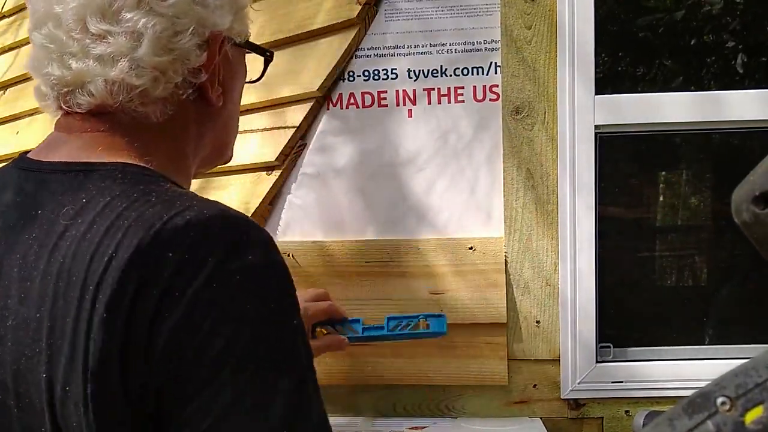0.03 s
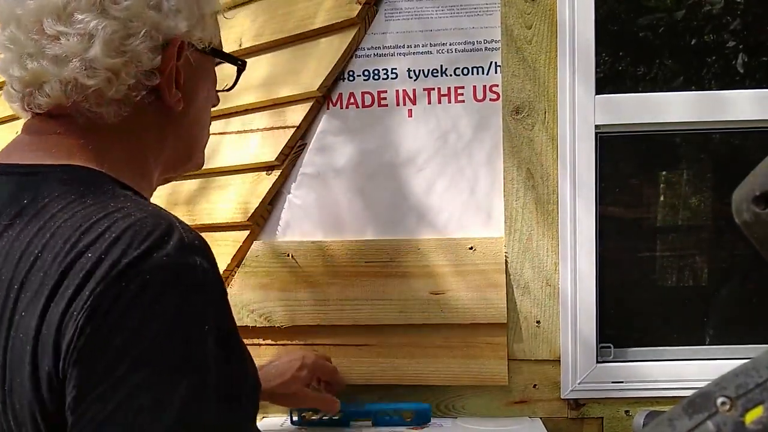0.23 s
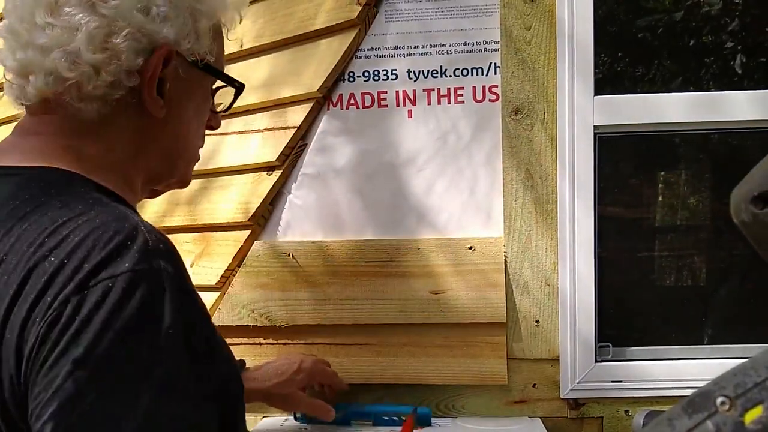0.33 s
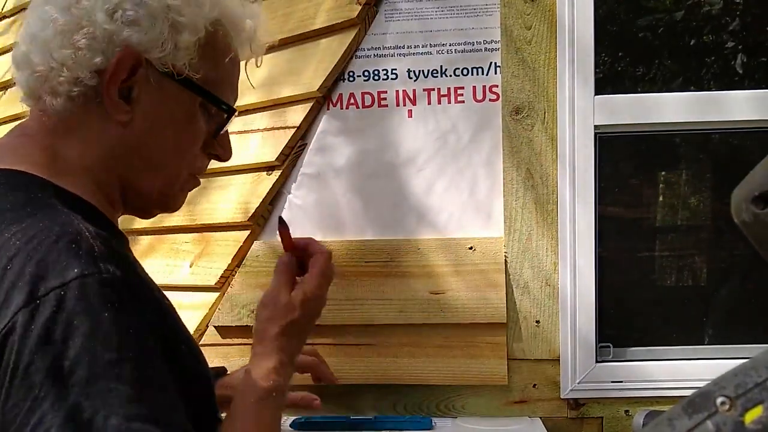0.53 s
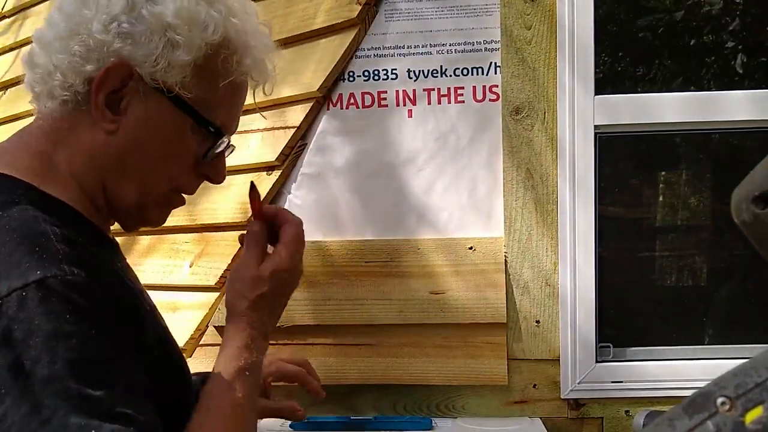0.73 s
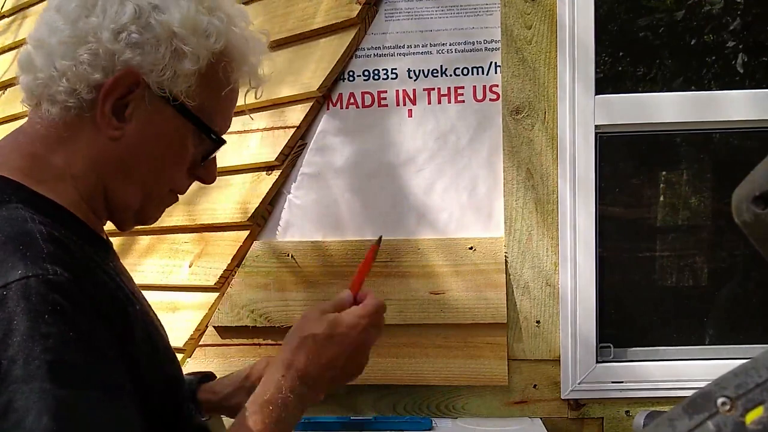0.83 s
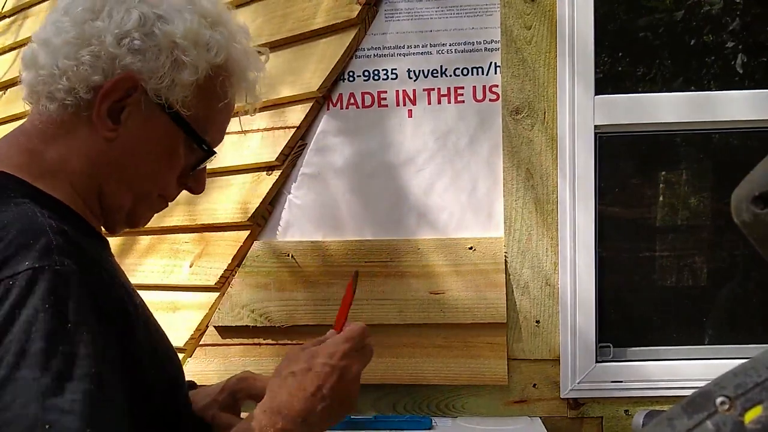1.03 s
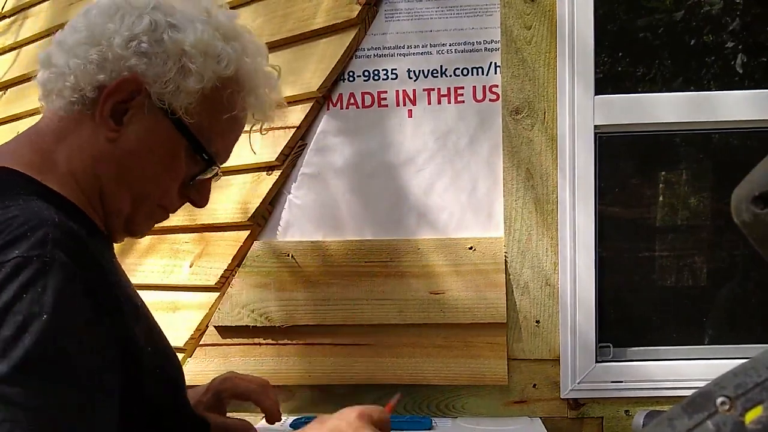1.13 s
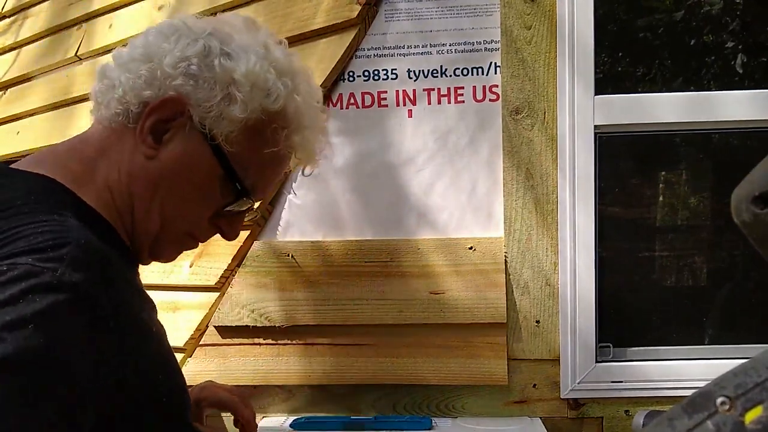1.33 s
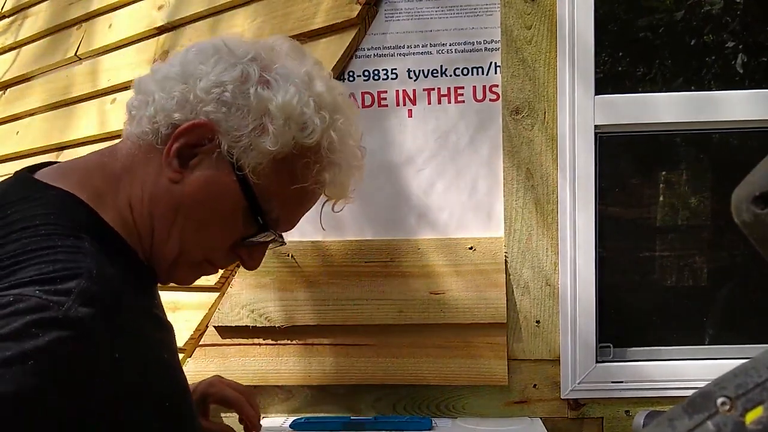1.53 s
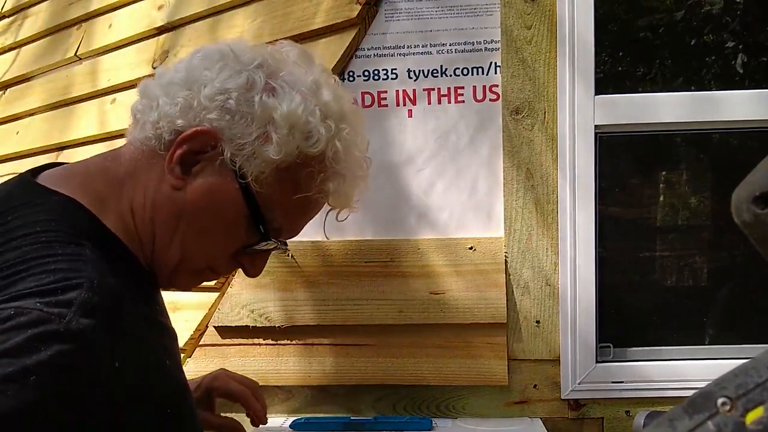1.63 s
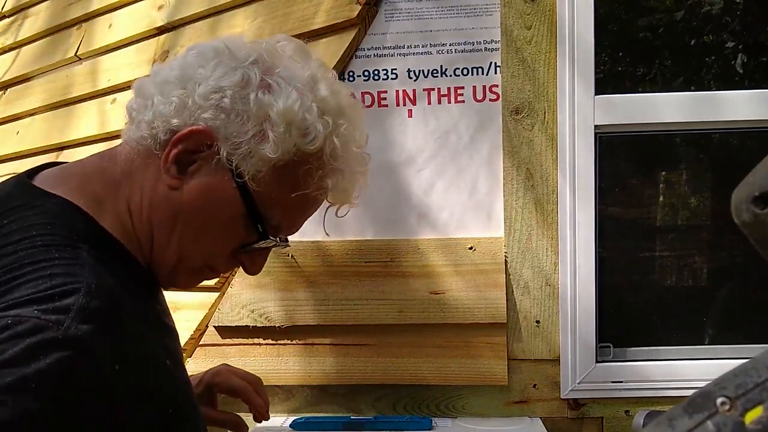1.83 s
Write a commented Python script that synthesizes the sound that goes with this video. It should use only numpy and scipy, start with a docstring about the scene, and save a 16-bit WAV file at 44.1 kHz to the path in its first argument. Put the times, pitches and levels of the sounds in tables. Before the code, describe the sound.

A plastic spirit level is set down on a wooden board with two sharp clacks, then rocks and settles in duller knocks. A hand softly bumps the wood afterwards, over a faint, high insect and quiet outdoor air.

```python
"""Outdoors by a house, a plastic spirit level slides off wooden siding and is set down on a board.
It gives two sharp clacks, then rocks and settles with a few duller knocks. Each knock makes the
board and the tool ring, and the wall and yard echo it. A hand then brushes and bumps the wood.
Behind this an insect pulses very high, over far-off whistles, a faint motor hum and quiet air."""
import sys
import numpy as np
from scipy import signal
from scipy.fft import rfft, irfft
from scipy.io import wavfile

SR = 44100
rng = np.random.default_rng(int(sys.argv[2]) if len(sys.argv) > 2 else 0)


def generate_wav(sig):
    """Save sig (samples, or channels by samples) to the path in sys.argv[1] as 16-bit PCM at SR."""
    pcm = np.round(np.clip(np.atleast_2d(sig).T, -1, 1) * 32767).astype(np.int16)
    wavfile.write(sys.argv[1], SR, pcm)


N = 83790

# Each knock; its four gains add to the base levels of the parts, set below the tables:
# start_s, gain_db, thump_db, thump_hz, favoured_hz, bright_hz, rise_s, crack_db, snap_db
KNOCK_EVENTS = [(0.238, -2, -4, 513, 935, 12930, 0.0022, 2, -20),
                (0.288, -3.5, -3, 427, 1994, 7600, 0.00028, 2, 8.5),
                (0.3046, -5, 2.5, 215, 901, 1700, 0.001, -33, -30),
                (0.3430, -9, 5, 285, 950, 4100, 0.0003, -17, -33),
                (0.3731, -13, 1, 309, 2125, 9800, 0.0033, -8, -18),
                (0.387, -14.5, -3.5, 376, 1800, 6160, 0.0013, -33, -24),
                (0.4417, -11, -11, 316, 2380, 3250, 0.0003, -23.5, -24),
                (0.4884, -6, -12.5, 301.4, 1182, 4390, 0.00031, -13.5, -22.5),
                (0.5660, -13, -11.5, 283, 800, 2600, 0.0012, -41, -38),
                (0.606, -26.5, -25, 278, 2330, 2950, 0.0017, -47, -49)]
# Light ticks of the edge chattering between knocks: start_s, level_db
EDGE_TICKS = [(.3565, -49), (.3815, -41), (.3895, -44)]
# Treble limit of each knock; the later knocks sound duller: time_s, limit_hz
TREBLE_LIMIT = [(.39, 16000), (.44, 12500), (.49, 9800)]
# Soft touches of a hand on the wood: start_s, level_db
HAND_TOUCHES = [(0.965, -58), (1.260, -53), (1.481, -44.5)]
# Far-off notes, probably birds: start_s, length_s, pitch_hz, level_db, overtone_db
WHISTLE_NOTES = [(0.937, 0.11, 975, -69.5, -35), (0.95, 0.058, 1294, -74, -25),
                 (1.041, 0.088, 1770, -80.5, -25), (1.058, 0.087, 2164, -85, -14),
                 (1.215, 0.03, 2780, -83, -25), (1.326, .14, 2160, -80, -7),
                 (1.731, 0.05, 3930, -79.5, -25)]
# Tones of a distant motor: pitch_hz, level_db
MOTOR_TONES = [(77.6, -69.5), (155.2, -74)]

# Tones that struck things ring with: pitch_hz, gain_db, decay_s (time to fade by 60 dB)
BOARD_TONES = [(155.3, -19.5, .5), (193, -17.5, 0.4), (261.4, -0.5, 0.16), (282.1, -1.5, 0.22),
               (316.4, -5.5, 0.37), (354.8, -11, 0.33), (444.6, 2, 0.24), (509.5, -1, 0.342)]
TOOL_TONES = [(791, -9, .14), (850, -3, .16), (933, 1, .11), (1001, -6, .14), (1044, -4, .15),
              (1120, -1, .11), (1334, -3, .1), (1396, -1, .16), (1555, 0, .12), (1770, -13, .85),
              (1866, 3, .12), (1986, 3, .11), (2090, 0, .1), (2348, 4, .14), (2690, 2, .1)]
SNAP_TONES = [(4980, 1, .018), (8350, -7, .016), (9950, 0, .013), (11000, 1, .018)]  # the hard plastic edge
TOUCH_TONES = [(505, 0, .06), (600, -6, .05), (890, -15, .05), (3100, -24, .04)]  # wood touched by a hand

# Colours, or how strong a noise is from low to high: pitch_hz, gain_db
CLATTER_COLOUR = [(120, -34), (230, -11.5), (450, -1), (620, -4), (900, -0.5), (1350, -2), (2300, -3.5),
                  (3300, -7.5), (6000, -13), (8500, -10), (11000, -2), (13000, -10.5), (16000, -24)]  # many short rings of tool and board together
CRACK_COLOUR = [(400, -35), (2000, 1), (4200, -16.5), (5000, -7.5), (6000, -5.5), (8300, -1.5),
                (10000, 0.5), (11100, -3.5), (11800, 1), (16000, -16)]  # the hard contact itself
THUD_COLOUR = [(120, -17), (200, -11), (270, 12.5), (480, 9), (700, 0), (1200, -29)]  # the board's dull thud
YARD_COLOUR = [(150, -12.5), (300, -6), (450, 4.5), (950, 5.5), (1400, -3.5), (1750, -3.5), (2200, -8.5),
               (4000, -1), (10000, 3), (16000, 1)]  # the yard's echoes
RUB_COLOUR = [(300, -12.5), (700, -13), (950, -2), (1200, -5.5), (1400, 7), (1600, -11.5), (1850, -16.5),
              (2300, -33), (6500, -35), (9000, -33), (10600, -7), (12000, -40.5), (16000, -61)]  # the tool rubbing on the siding
HANDLING_COLOUR = [(420, 1.5), (1100, -0.5), (2000, -9.5), (3100, -0.5), (4000, -5), (5500, -20)]  # hands and sleeves
RASP_COLOUR = [(6000, -11), (8500, -8), (10000, -7.5), (11100, 8), (12200, -18.5), (15000, -20.5),
               (16500, -23)]  # the insect's rasp
AIR_COLOUR = [(25, -15.5), (60, -9.5), (110, -8.5), (200, -5), (300, -6), (390, 6), (480, -12), (620, -2.5),
              (720, -11), (920, 0.5), (1100, -21), (2000, -28), (3500, -24), (6000, -40), (9000, -22),
              (13000, -21.5), (16000, -38)]  # outdoor air
FAR_RUSH_COLOUR = [(300, -32), (420, -7), (520, 2), (610, 6.5), (680, -32.5), (1000, -32)]  # a low rush in the distance

# How the longer sounds swell and fade: time_s, level_db
SLIDE_LEVELS = [(0, -55), (.04, -56), (.08, -52), (.13, -56), (.182, -56), (.197, -76), (.235, -78)]
HANDLING_LEVELS = [(.85, -100), (.93, -78), (1.15, -88.5), (1.42, -85), (1.49, -86.5), (1.9, -86)]
INSECT_LEVELS = [(0, -56.5), (.12, -56.5), (.2, -62), (.55, -57.5), (.62, -64), (.73, -56.5), (.85, -72),
                 (.95, -53), (1.0, -56.5), (1.07, -69.5), (1.12, -53.5), (1.25, -60.5), (1.3, -72.5),
                 (1.38, -57), (1.44, -67.5), (1.56, -65.5), (1.72, -61.5), (1.82, -72.5), (1.9, -76)]
FAR_RUSH_LEVELS = [(0, -71.5), (.8, -69), (1.15, -79), (1.3, -72), (1.55, -68.5), (1.9, -70.5)]

CLATTER_DB, TOOL_DB, CRACK_DB, SNAP_DB, BOARD_DB, THUD_DB = -20.5, -37.5, -28, -28, -36, -33.5
FAVOUR_DB, FAVOUR_OCTAVES = 5.5, .21  # each knock lifts the tones near its favoured pitch
BOARD_RISE_S, BOARD_LOW_HZ, THUMP_OCTAVES = .0078, 150, .8
SLIDE_DB, SQUEAK_HZ, SQUEAK_WAVER, SQUEAK_DB = -1.5, 1372, .021, -5
INSECT_HZ, INSECT_WAVER_HZ, RASP_DB = 11090, 80, -15.5
PULSE_RATE_HZ, PULSE_FIRST_S, PULSE_WIDTH_S = 38.8, .018, .0029
AIR_DB, AIR_FLICKER_DB = -70, 3


def knocks(t):
    """The tool hits the board: the contact cracks and snaps, both ring, and the board thumps."""
    hz, out = np.fft.rfftfreq(N, 1 / SR), np.zeros(N)
    for start, db, thump_db, thump_hz, favoured_hz, bright_hz, rise, crack_db, snap_db in KNOCK_EVENTS:
        lift_db = lambda pitch: FAVOUR_DB * near(pitch, favoured_hz, FAVOUR_OCTAVES)
        clatter = irfft(rfft(noise(CLATTER_COLOUR)) * soften(hz, bright_hz) * gain(lift_db(hz)), N)
        knock = gain(db + CLATTER_DB) * fade(clatter, start, rise, decay_s=.13, slope=-.11)
        tool = [(pitch, level + lift_db(pitch), decay) for pitch, level, decay in TOOL_TONES]
        knock += gain(db + TOOL_DB) * ring(tool, start, rise, bright_hz, scatter_db=3)
        knock += gain(crack_db + CRACK_DB) * crack(t - start)
        snap = ring(SNAP_TONES, start, rise_s=.00074, bright_hz=16000, scatter_db=2)
        knock += gain(snap_db + SNAP_DB) * snap
        # Where the tool lands decides which board tones sound most.
        board = [(pitch, level + 20 * np.log10(near(pitch, thump_hz, THUMP_OCTAVES)), decay)
                 for pitch, level, decay in BOARD_TONES]
        knock += gain(thump_db + BOARD_DB) * ring(board, start, BOARD_RISE_S, bright_hz, scatter_db=2.5)
        thud = irfft(rfft(noise(THUD_COLOUR)) * near(hz, thump_hz, THUMP_OCTAVES), N)
        knock += gain(thump_db + THUD_DB) * thud * strike(start, BOARD_RISE_S, decay_s=.1)
        band = signal.butter(6, [BOARD_LOW_HZ, follow(TREBLE_LIMIT, start)], "band", fs=SR, output="sos")
        out += signal.sosfilt(band, knock)
    return out + sum(gain(db) * crack(t - start) for start, db in EDGE_TICKS)


def crack(age, rise_s=.0002, hold_s=.002, decay_s=.013):
    """Hard plastic meets wood: a burst of noise that holds for a moment, then drops at once."""
    drop = np.exp(-np.log(1000) * np.maximum(age - hold_s, 0) / decay_s)
    return noise(CRACK_COLOUR) * np.clip(age / rise_s, 0, 1) * drop


def yard_echo(sound):
    """The wall and trees scatter the sound back a moment later."""
    tail = fade(noise(YARD_COLOUR), start_s=.00955, rise_s=.0059, decay_s=.68, slope=-.3)
    return echoes(sound, tail, level_db=-14)


def hand_bumps():
    """A soft hand touches the wood, which gives a short, dull ring."""
    return sum(gain(db) * ring(TOUCH_TONES, start, rise_s=.005, bright_hz=4000, scatter_db=1)
               for start, db in HAND_TOUCHES)


def slide(t):
    """The tool rubs lightly and unevenly on the siding, with a wavering squeak."""
    squeak = np.sqrt(2) * np.sin(phase_of(SQUEAK_HZ * (1 + SQUEAK_WAVER * wander(100))))
    pressure = gain(SLIDE_DB + follow(SLIDE_LEVELS, t, after=-120) + 2 * wander(50))
    return pressure * (noise(RUB_COLOUR) + gain(SQUEAK_DB) * squeak)


def rustle(t, uneven_db=3.5):
    """Hands and sleeves brush the work in small, uneven scuffs."""
    return gain(follow(HANDLING_LEVELS, t) + uneven_db * wander(45)) * noise(HANDLING_COLOUR)


def insect(t, uneven_db=1.7):
    """Steady wing strokes pulse a very high tone with a little rasp, blurred by short echoes."""
    cycle = (t - PULSE_FIRST_S) * PULSE_RATE_HZ + .5
    from_peak_s = (cycle % 1 - .5) / PULSE_RATE_HZ
    strokes = np.exp(-.5 * (from_peak_s / PULSE_WIDTH_S) ** 2)
    tone = np.sqrt(2) * np.sin(phase_of(INSECT_HZ + INSECT_WAVER_HZ * wander(250)))
    loudness = gain(follow(INSECT_LEVELS, t) + uneven_db * wander(28))
    song = loudness * strokes * (tone + gain(RASP_DB) * noise(RASP_COLOUR))
    tail = rng.standard_normal(N) * strike(start_s=.0054, rise_s=.002, decay_s=.179)
    return song + echoes(song, tail, level_db=-9.5)


def whistles(t, waver=.011, overtone_ratio=1.94):
    """Far-off wavering notes swell and fade, each with one weaker, higher tone."""
    out = np.zeros(N)
    for start, length, hz, db, overtone_db in WHISTLE_NOTES:
        phase = phase_of(hz * (1 + waver * wander(110)))
        swell = np.sin(np.pi * np.clip((t - start) / length, 0, 1) ** .59)
        note = np.sin(phase) + gain(overtone_db) * np.sin(overtone_ratio * phase)
        out += gain(db) * np.sqrt(2) * swell * note
    return out


def motor_hum(t):
    """A distant motor hums on two steady, low tones."""
    return sum(gain(db) * np.sqrt(2) * np.sin(2 * np.pi * (hz * t + rng.random()))
               for hz, db in MOTOR_TONES)


def outdoor_air(t):
    """Quiet air flickers in each octave, while a faint, distant rush swells and fades."""
    air = sum(band * gain(AIR_FLICKER_DB * wander(10)) for _, band in octave_bands(noise(AIR_COLOUR)))
    rush = gain(follow(FAR_RUSH_LEVELS, t)) * noise(FAR_RUSH_COLOUR)
    return gain(AIR_DB) * air + rush


def ring(tones, start_s, rise_s, bright_hz, scatter_db, detune=.005):
    """A struck thing rings with fading tones; each hit shifts their level and pitch a little."""
    age, out = np.arange(N) / SR - start_s, np.zeros(N)
    for hz, db, decay_s in tones:
        level_shift, pitch_shift = rng.standard_normal(2)
        strength = gain(db + scatter_db * level_shift) * soften(hz, bright_hz)
        tone = np.sin(2 * np.pi * hz * (1 + detune * pitch_shift) * age)
        out += strength * tone * strike(start_s, rise_s, decay_s)
    return out


def strike(start_s, rise_s, decay_s):
    """The loudness of a hit: it swells quickly, then dies away."""
    age = np.maximum(np.arange(N) / SR - start_s, 0)
    return (1 - np.exp(-age / rise_s)) * np.exp(-np.log(1000) * age / decay_s)


def fade(sound, start_s, rise_s, decay_s, slope):
    """Shape a sound like a hit; decay_s holds at 1 kHz, and a negative slope ends the highs sooner."""
    return sum(band * strike(start_s, rise_s, decay_s * 2 ** (octave * slope))
               for octave, band in octave_bands(sound))


def octave_bands(sound):
    """Split a sound from low to high into pairs of (octaves above 1 kHz, band)."""
    octave = np.log2(np.clip(np.fft.rfftfreq(N, 1 / SR), 125, 16000) / 1000)
    spectrum = rfft(sound)
    return [(k, irfft(spectrum * np.maximum(1 - abs(octave - k), 0), N)) for k in range(-3, 5)]


def echoes(sound, tail, level_db):
    """Spread a sound along a tail of reflections."""
    return gain(level_db) * signal.fftconvolve(sound, tail / np.sqrt(np.sum(tail ** 2)))[:N]


def soften(hz, bright_hz):
    """A softer contact makes less treble: pitches above bright_hz get weaker."""
    return 1 / np.sqrt(1 + (hz / bright_hz) ** 4)


def near(hz, centre_hz, octaves):
    """A weight that is 1 at the centre pitch and falls away on both sides."""
    return 1 / (1 + (np.log2((hz + 1) / centre_hz) / octaves) ** 2)


def noise(colour):
    """Noise with the given colour and a typical size of 1."""
    hz, db = np.array(colour, float).T
    shape = gain(np.interp(np.log(np.fft.rfftfreq(N, 1 / SR) + 1), np.log(hz), db))
    hiss = irfft(rfft(rng.standard_normal(N)) * shape, N)
    return hiss / hiss.std()


def wander(rate_hz):
    """A smooth random drift with a typical size of 1."""
    smoothing = np.exp(-(np.fft.rfftfreq(N, 1 / SR) / rate_hz) ** 2)
    drift = irfft(rfft(rng.standard_normal(N)) * smoothing, N)
    return drift / drift.std()


def phase_of(hz):
    """The running angle of a wave whose pitch changes."""
    return 2 * np.pi * np.cumsum(hz) / SR


def follow(points, t, after=None):
    """Join (time, value) points with straight lines and read them at time t."""
    return np.interp(t, *np.array(points).T, right=after)


def gain(db):
    """Turn decibels into a multiplier."""
    return 10 ** (np.asarray(db) / 20)


def scene():
    """Mix the hits, their echoes and the quieter sounds into one channel."""
    t = np.arange(N) / SR
    hits = knocks(t) + hand_bumps()
    nearby = hits + yard_echo(hits) + slide(t) + rustle(t)
    return (nearby + insect(t) + whistles(t) + motor_hum(t) + outdoor_air(t))[None]


def record(dry, ceiling=.4, top_hz=16500):
    """Round off the sharpest peaks and cut the very highest treble."""
    rounded = ceiling * np.tanh(dry / ceiling)
    return signal.sosfilt(signal.ellip(8, .2, 70, top_hz, fs=SR, output="sos"), rounded)


dry = scene()
out = record(dry)
generate_wav(out)
```